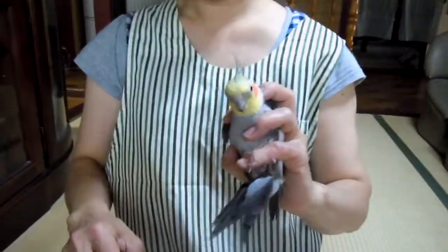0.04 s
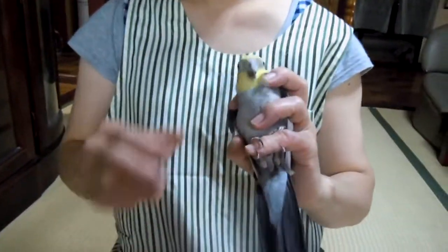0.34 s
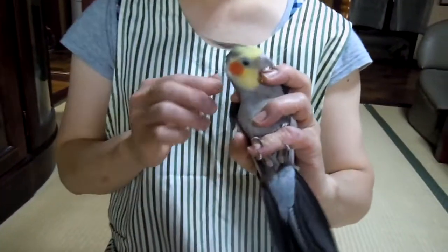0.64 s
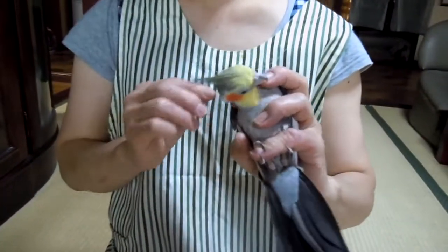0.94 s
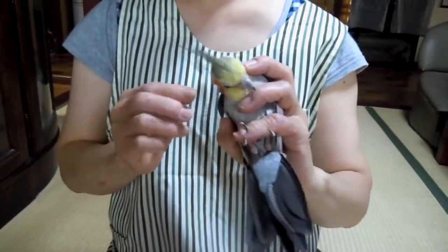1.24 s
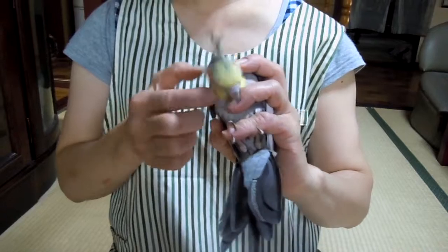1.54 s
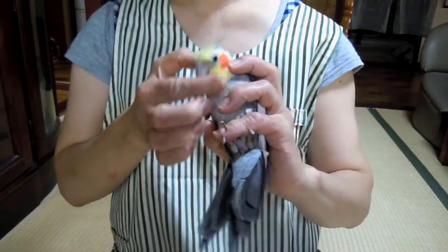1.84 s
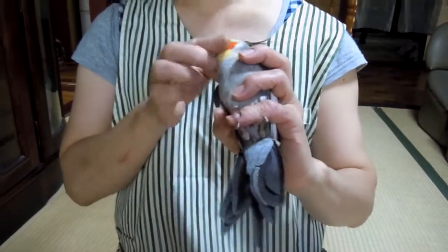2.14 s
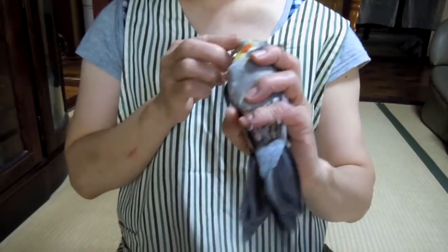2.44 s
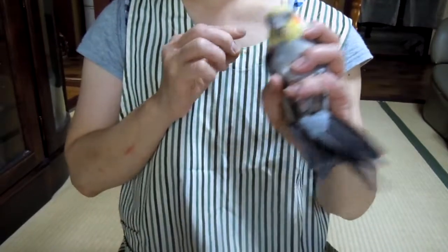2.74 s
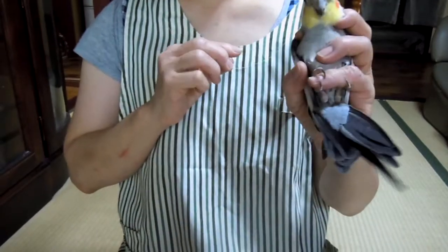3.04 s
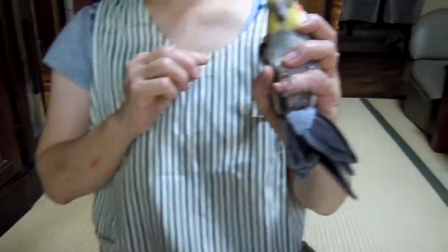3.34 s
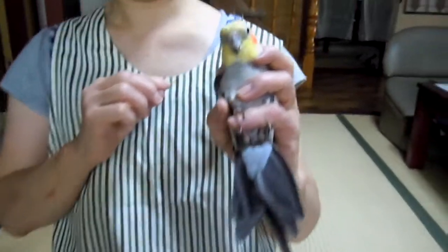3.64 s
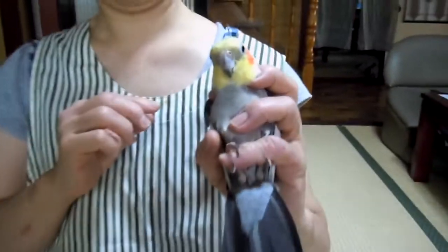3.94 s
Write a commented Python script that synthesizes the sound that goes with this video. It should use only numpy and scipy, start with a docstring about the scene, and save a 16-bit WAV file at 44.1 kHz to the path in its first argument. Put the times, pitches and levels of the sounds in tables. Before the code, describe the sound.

One short, breathy hiss from a hand-held cockatiel follows its light beak clicks and a few faint claw ticks. The bird is close by in a small room, with a steady high insect chorus from outside.

```python
"""From the start, insects outdoors sizzle steadily over the low rumble of a small matted room.
Claws or fingernails tick, and a few thin insect tones stand out of the chorus.
From 0.36 s a cockatiel held in a hand clicks its beak softly as a finger comes near;
each snap rings its mouth cavity. At about 3.7 s the bird hisses once, close by:
turbulent air excites the resonances of its throat and beak."""
import sys
import numpy as np
from scipy import signal
from scipy.fft import rfft, irfft, next_fast_len
from scipy.io import wavfile
from scipy.ndimage import uniform_filter1d, map_coordinates

SR = 44100
rng = np.random.default_rng(int(sys.argv[2]) if len(sys.argv) > 2 else 0)


def materialize(psi):
    """Save the field psi as 16-bit PCM at rate SR to the path in sys.argv[1].

    A 1-D psi becomes a single channel; in a 2-D psi each row is a channel.
    """
    bounded = np.clip(np.atleast_2d(psi).T, -1, 1)
    quanta = np.round(bounded * 32767).astype(np.int16)
    wavfile.write(sys.argv[1], SR, quanta)


N = 176400


def amp(db):
    """Amplitude ratio of a level in decibels."""
    return 10 ** (np.asarray(db) / 20)


def unit(x):
    """Normalisation to rms 1."""
    return x / np.sqrt(np.mean(x ** 2) + 1e-20)


def along(points, hz):
    """Interpolation of (frequency_hz, value) points on a logarithmic frequency axis."""
    knots_hz, values = np.transpose(points)
    return np.interp(np.log(hz + 1), np.log(knots_hz + 1), values)


def curves(rows):
    """Linear interpolation in time: one curve for each column after time_s."""
    time_s, *columns = np.transpose(rows)
    return [np.interp(np.arange(N) / SR, time_s, column) for column in columns]


def wobble(rate_hz):
    """Random modulation: a spline through rate_hz Gaussian values a second."""
    knots = rng.standard_normal(int(N * rate_hz / SR) + 4)
    return map_coordinates(knots, [np.arange(N) * rate_hz / SR])


def filtered(x, response):
    """Linear filtering: the spectrum is multiplied by a frequency response."""
    size = next_fast_len(N + SR // 2)
    return irfft(rfft(x, size) * response(np.fft.rfftfreq(size, 1 / SR)), size)[..., :N]


def pan(db):
    """Interchannel level difference: two gains, the left exceeding the right by db."""
    return amp(np.array([[.5], [-.5]]) * db)


def spread(pair, correlation):
    """Partial coherence: two independent noises, as mid and side, set the left-right correlation."""
    def weights(hz):
        angle = np.arccos(np.clip(along(correlation, hz), -1, 1)) / 2
        return np.array([np.cos(angle), np.sin(angle)])
    mid, side = filtered(pair, weights)
    return np.array([mid + side, mid - side])


def noise(spectrum, patchy_db=0):
    """Spectral shaping: two noises of rms 1, their gain varying in patches of time and frequency."""
    bins = signal.stft(rng.standard_normal((2, N)), nperseg=1024)[2]
    patches = uniform_filter1d(rng.standard_normal(bins.shape[1:]), size=4, axis=0)
    patches = uniform_filter1d(patches, size=14, axis=1)
    pair = signal.istft(bins * amp(patchy_db * unit(patches)), nperseg=1024)[1][:, :N]
    return unit(filtered(pair, lambda hz: amp(along(spectrum, hz))))


def resonance(centre_hz, width_hz):
    """Quadrature modulation: two noise bands of rms 1 about a centre that may move."""
    white = rng.standard_normal((2, 2, N))
    in_phase, quadrature = filtered(white, lambda hz: 1 / np.hypot(1, (2 * hz / width_hz) ** 3))
    phase = 2 * np.pi * np.cumsum(centre_hz * np.ones(N)) / SR
    return unit(in_phase * np.cos(phase) + quadrature * np.sin(phase))


def strike(t, rise_s, t60_s):
    """Impact envelope of peak 1: a rounded rise, then exponential damping."""
    shape = (1 - np.exp(-(t / rise_s) ** 2)) * amp(-60 * t / t60_s)
    return shape / shape.max()


def add(track, start_s, sound):
    """Superposition of a sound on a track, from start_s on."""
    track[:, round(start_s * SR):][:, :sound.shape[-1]] += sound


# Spectrum of the room noise: frequency_hz, relative_db
RUMBLE_SPECTRUM = [(20, 1.5), (35, 1), (60, -2), (110, -2), (250, -6), (500, -10.5), (800, -13.5),
                   (1200, -16), (1450, -12), (1750, -18.5), (2500, -19), (5000, -32.5), (10500, -17.5),
                   (14000, -20)]
# Its left-right coherence: frequency_hz, correlation
RUMBLE_COHERENCE = [(50, 0.97), (130, 0.9), (300, 0.81), (700, 0.43), (1300, 0.64), (2400, 0.41),
                    (8000, 0.034), (14000, 0)]
# Its balance: frequency_hz, left_minus_right_db
RUMBLE_PAN = [(250, 0), (650, 1), (1400, 2), (2300, 0.5), (8000, 5.5), (13000, 4)]


def room_rumble(gain_db=-44.5):
    """Broadband ambient noise: a nearly coherent rumble under a faint, diffuse hiss."""
    air = spread(noise(RUMBLE_SPECTRUM, patchy_db=1.4), RUMBLE_COHERENCE)
    return amp(gain_db) * filtered(air, lambda hz: pan(along(RUMBLE_PAN, hz)))


# Swell of the insect chorus: time_s, relative_db
CHORUS_LEVELS = [(0, -40.5), (.6, -41), (.95, -41), (1.3, -41), (1.8, -40.5), (2.35, -39), (2.75, -41.6),
                 (3.15, -40), (3.35, -41), (3.62, -39), (4, -39.5)]
# Swell of its low edge: time_s, level_db
LOW_EDGE_LEVELS = [(0, -65), (.17, -50.5), (.62, -58), (.82, -49.5), (1.25, -53.5), (2.1, -58), (2.7, -63),
                   (3.3, -57), (3.5, -52), (4, -53)]
# Spectrum of the chorus: frequency_hz, relative_db
CHORUS_SPECTRUM = [(2200, -26), (3000, -13), (3500, -11.5), (3950, -7.5), (4650, 0.5), (5400, 0.5),
                   (6200, -2.5), (7900, -4), (8700, -11.5), (10000, -21.5), (14000, -27)]
# Its left-right coherence: frequency_hz, correlation
CHORUS_COHERENCE = [(3000, 1), (4500, 0.91), (6000, 0.68), (8000, 0.39), (11000, 0)]
# Balance of all the insects: frequency_hz, left_minus_right_db
INSECT_PAN = [(3000, 0), (5000, -0.5), (7000, -2), (9000, -2)]


def insect_chorus(trim_db=0.63, shimmer_db=-0.11):
    """Incoherent summation: many far insects merge into one band, whose low edge swells on its own."""
    level_db, = curves(CHORUS_LEVELS)
    edge_db, = curves(LOW_EDGE_LEVELS)
    envelope = amp(level_db + trim_db + shimmer_db * wobble(120))
    sizzle = envelope * noise(CHORUS_SPECTRUM, patchy_db=1.86)
    low_edge = amp(edge_db) * resonance(centre_hz=3952, width_hz=690)
    chorus = spread(sizzle + low_edge, CHORUS_COHERENCE)
    return filtered(chorus, lambda hz: pan(along(INSECT_PAN, hz)))


# Contacts of claw or nail: start_s, relative_db, pitch_hz
CLAW_TICKS = [(0.045, -33, 9100), (.233, -31, 9500), (0.5164, -22, 9900), (1.7148, -31, 12100),
              (2.1964, -31, 11600)]


def claw_ticks():
    """Impact transients: each brief contact of claw or nail gives a heavily damped burst of treble."""
    out = np.zeros((2, N))
    t = np.arange(SR // 80) / SR
    envelope = strike(t, rise_s=0.00028, t60_s=0.003)
    for start_s, level_db, pitch_hz in CLAW_TICKS:
        band = resonance(pitch_hz, width_hz=1800)[:, :len(t)]
        add(out, start_s, amp(level_db) / 2 * envelope * band)
    return pan(db=12) * out


# Thin tones of single insects: start_s, end_s, pitch_hz, level_db
INSECT_TRILLS = [(.15, .46, 4710, -52), (.15, .42, 4360, -56), (1.6, 2.9, 7865, -57)]


def insect_trills(waver_hz=22, fade_s=0.06):
    """Frequency modulation: single far insects sound as slightly wavering tones that fade in and out."""
    tones = np.zeros(N)
    t = np.arange(N) / SR
    for start_s, end_s, pitch_hz, level_db in INSECT_TRILLS:
        fade = np.clip(np.minimum(t - start_s, end_s - t) / fade_s, 0, 1)
        phase = 2 * np.pi * np.cumsum(pitch_hz + waver_hz * wobble(90)) / SR
        tones += amp(level_db) * fade * unit(np.sin(phase))
    return filtered(tones, lambda hz: pan(along(INSECT_PAN, hz)))


# Clicks of the beak: start_s, relative_db, pitch_hz, ring_left_minus_right_db, snap_gain_db
BEAK_CLICKS = [(.3646, -28, 2100, -8, -19), (0.4715, -31, 2080, -8, -13), (1.3865, -38, 1930, 0, -14),
               (1.4806, -42, 1860, -6, -12), (1.5599, -30.5, 2100, -12, 6), (1.5994, -36, 2100, -12, -12),
               (2.0932, -38, 1870, -1, -18), (2.1176, -25, 2140, -8.5, -20), (2.1961, -28, 2300, -11, 6),
               (2.2161, -11, 2373, -12.5, -4.5), (2.424, -44, 2310, 0, -10),
               (2.486, -36.5, 2460, -10, -19.5), (2.573, -22, 2410, -9, -7)]
# Spectrum of the snap: frequency_hz, relative_db
SNAP_SPECTRUM = [(200, -6), (700, -2), (1400, 0), (3200, -8), (4200, 8), (6000, -5), (9000, 3), (11000, 1),
                 (14000, -14)]
# Modes of the mouth cavity: pitch_ratio, relative_db, t60_s
MOUTH_MODES = [(.8, -17, 0.012), (1, 4, 0.0049), (1.13, -5, 0.0067), (1.3, -15, 0.0077)]


def beak_clicks(ring_lag_s=0.0008, ring_gain_db=-2):
    """Impulse excitation: a tiny snap of the beak rings the damped modes of the mouth cavity."""
    out = np.zeros((2, N))
    t = np.arange(SR // 40) / SR
    grit = noise(SNAP_SPECTRUM)
    snap_envelope = strike(t, rise_s=0.00046, t60_s=0.012)
    for start_s, level_db, pitch_hz, pan_db, snap_db in BEAK_CLICKS:
        snap = amp(snap_db) / 2 * snap_envelope * grit[:, round(start_s * SR):][:, :len(t)]
        ring = np.zeros(len(t))
        for ratio, mode_db, t60_s in MOUTH_MODES:
            envelope = amp(mode_db) * strike(t, rise_s=0.0011, t60_s=t60_s)
            ring += envelope * np.sin(2 * np.pi * ratio * pitch_hz * t)
        add(out, start_s, amp(level_db) * pan(db=3) * snap)
        add(out, start_s + ring_lag_s, amp(level_db + ring_gain_db) * pan(pan_db) * ring)
    return out


# Relative levels of the hiss's two resonances and airy treble: time_s, lower_db, upper_db, air_db
HISS_LEVELS = [(3.655, -60, -67, -72), (3.669, -38, -44, -44), (3.681, -27.5, -36, -35),
               (3.70, -29, -37, -35), (3.722, -27.5, -24.5, -31.5), (3.757, -36.5, -24, -36),
               (3.777, -38, -32.5, -41), (3.81, -47, -42, -55), (3.86, -56, -45, -76)]
# Resonances moving apart as the beak works: time_s, lower_hz, upper_hz
HISS_RESONANCES = [(3.675, 3760, 5700), (3.70, 3675, 5600), (3.732, 3246, 5750), (3.752, 3290, 6380),
                   (3.79, 3220, 6070)]
# Spectrum of the airy treble: frequency_hz, relative_db
AIR_SPECTRUM = [(1500, -22), (2200, -5), (2900, -4), (4500, 5.5), (7000, 0), (8000, 0), (9500, 0),
                (11200, 0), (12300, -11), (14200, -21)]
# Left-right coherence of the hiss: frequency_hz, correlation
HISS_COHERENCE = [(2500, 1), (4500, 0.91), (7000, .68), (10000, 0), (14000, 0)]
# Its balance: frequency_hz, left_minus_right_db
HISS_BALANCE = [(3000, 0.5), (7000, -2), (9500, 3), (13000, 10)]


def bird_hiss(air_gain_db=5, flutter_db=0.7, cutoff_hz=2580):
    """Source and filter: turbulent air excites two moving resonances of throat and beak."""
    lower_db, upper_db, air_db = curves(HISS_LEVELS)
    lower_hz, upper_hz = curves(HISS_RESONANCES)
    lower = amp(lower_db) * resonance(lower_hz, width_hz=1070)
    upper = amp(upper_db) * resonance(upper_hz, width_hz=1200)
    air = amp(air_db + air_gain_db) * noise(AIR_SPECTRUM, patchy_db=1.5)
    t = np.arange(N) / SR
    sounding = (t > HISS_LEVELS[0][0]) & (t < HISS_LEVELS[-1][0])
    flutter = amp(flutter_db * wobble(300))
    puff = spread((lower + upper + air) * sounding * flutter, HISS_COHERENCE)
    highpass = lambda hz: 1 / np.hypot(1, (cutoff_hz / (hz + 1)) ** 6)
    return filtered(puff, lambda hz: pan(along(HISS_BALANCE, hz)) * highpass(hz))


def early_reflections(x, count=6, latest_s=0.011, typical_db=-10.5):
    """Comb filtering: faint delayed copies from body, hands and floor interfere with the direct sound."""
    lags, sizes = rng.random((count, 2)).T
    delays_s = latest_s * (1 + 2 * lags) / 3
    gains = amp(typical_db) * (.5 + sizes)
    return x + filtered(x, lambda hz: gains @ np.exp(-2j * np.pi * np.outer(delays_s, hz)))


# Reverberation time of the matted room: frequency_hz, t60_s
ROOM_DECAY = [(300, 0.24), (2500, 0.093), (12000, 0.14)]


def reverberation(x, wet_db):
    """Convolution with exponentially decaying noise adds the room's short diffuse tail."""
    hz, t, bins = signal.stft(rng.standard_normal((2, SR // 2)), SR, nperseg=256)
    decay = amp(-60 * t / along(ROOM_DECAY, hz)[:, None])
    tail = signal.istft(bins * decay, SR, nperseg=256)[1]
    tail = np.pad(tail / np.linalg.norm(tail[0]), ((0, 0), (SR // 200, 0)))  # arrives 5 ms late
    wet = signal.fftconvolve(x.mean(axis=0)[None], tail, axes=1)[:, :N]
    return x + amp(wet_db) * wet


def scene():
    """Superposition: the steady background, the ticks and clicks, and finally the hiss."""
    background = room_rumble() + insect_chorus() + insect_trills()
    contacts = reverberation(claw_ticks() + beak_clicks(), wet_db=-14.5)
    hiss = reverberation(early_reflections(bird_hiss()), wet_db=-19)
    return background + contacts + hiss


def record(dry):
    """Band limiting: an ideal low-pass filter removes the highest treble."""
    return filtered(dry, lambda hz: hz < 14220)


dry = scene()
out = record(dry)
materialize(out)
```